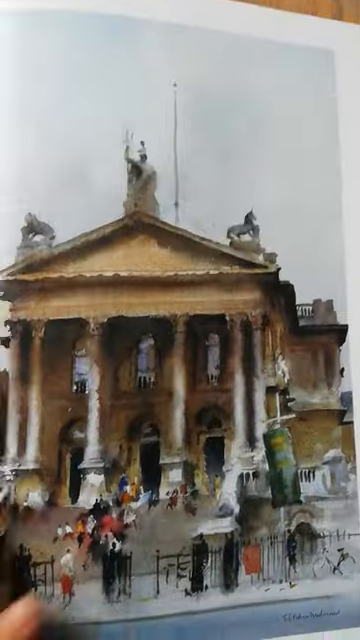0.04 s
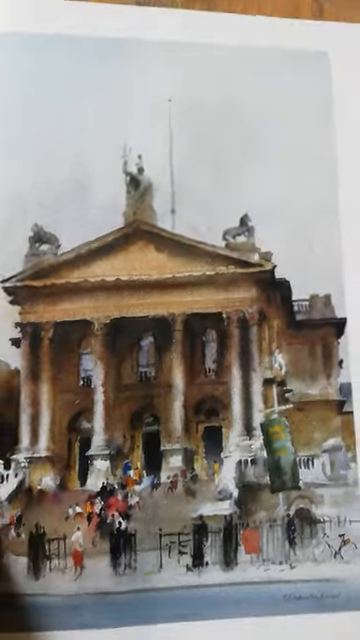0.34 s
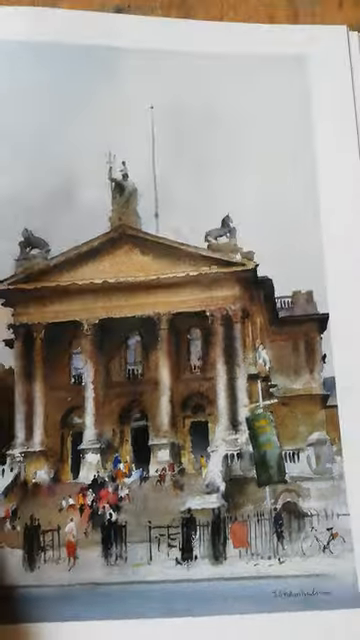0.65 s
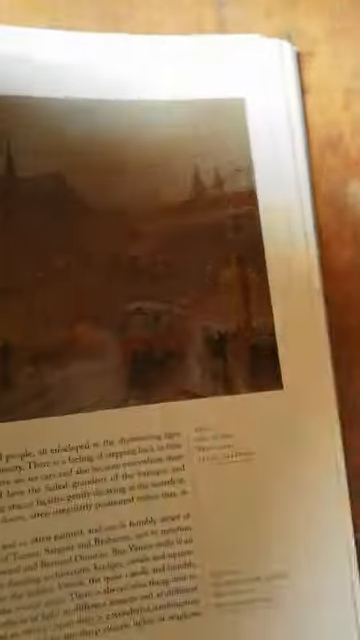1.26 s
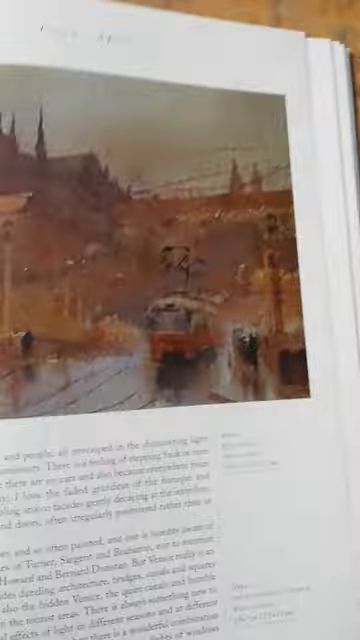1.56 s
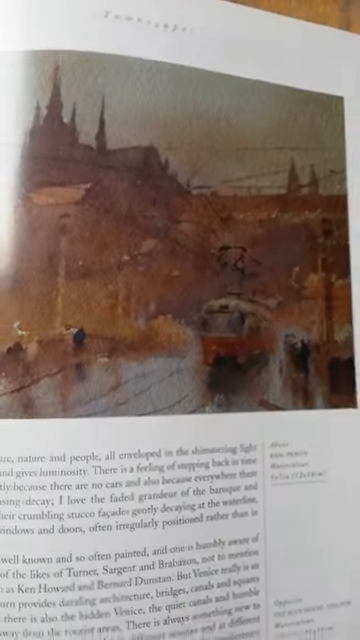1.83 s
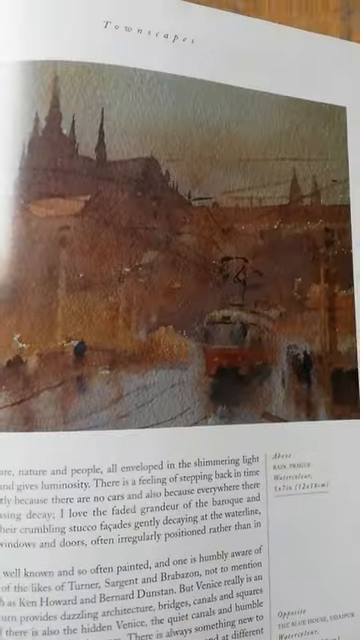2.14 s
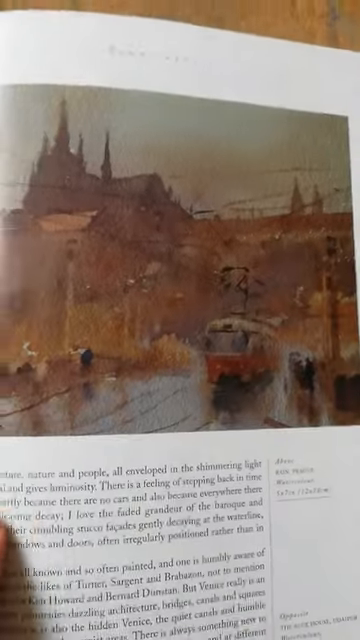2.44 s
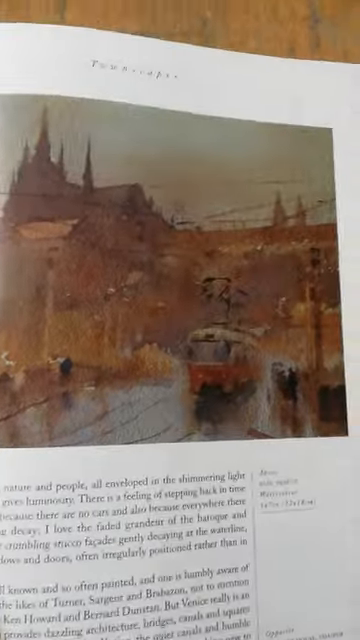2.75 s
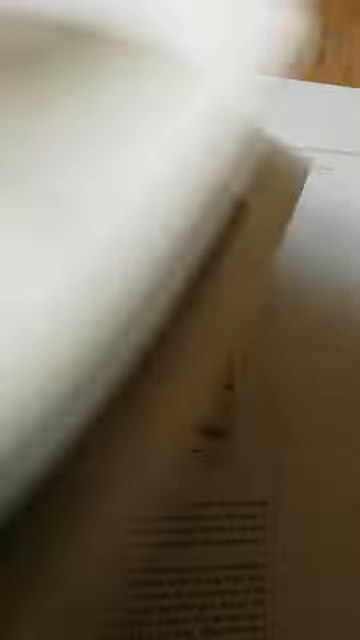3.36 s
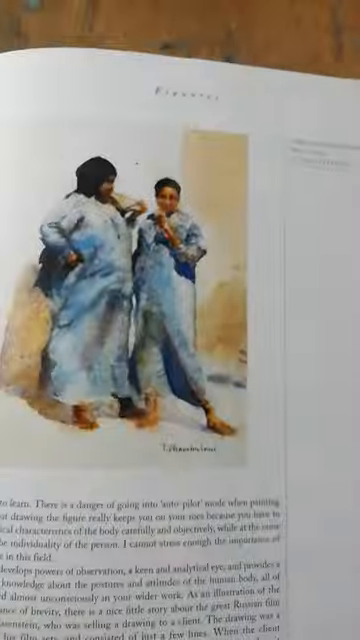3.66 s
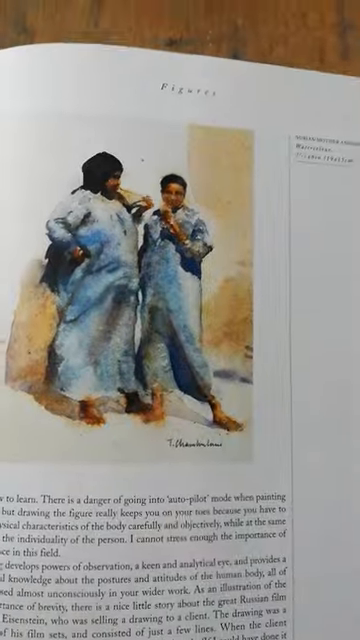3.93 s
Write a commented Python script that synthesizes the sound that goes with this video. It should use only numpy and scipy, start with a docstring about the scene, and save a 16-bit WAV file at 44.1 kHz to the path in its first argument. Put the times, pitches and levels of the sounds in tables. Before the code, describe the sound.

Two glossy book pages rustle and turn close by in a quiet room.

```python
"""A fine, gritty hiss of sliding paper comes first, over a faint hum, microphone hiss and low rumble.
Two pages of a large glossy book are turned on a table in a quiet room, close to the microphone.
Fingers and sheets rub in thousands of tiny slips, fingertips tap, and the paper snaps as it buckles.
The second page whips tight with a slap, then flops down on a cushion of air."""
import sys
import numpy as np
from scipy import signal
from scipy.fft import rfft, irfft, next_fast_len
from scipy.io import wavfile
from scipy.ndimage import uniform_filter1d

SR = 44100
rng = np.random.default_rng(int(sys.argv[2]) if len(sys.argv) > 2 else 0)


def materialize(psi):
    """Save the field psi as 16-bit PCM at rate SR to the path in sys.argv[1].

    A 1-D psi becomes a single channel; in a 2-D psi each row is a channel.
    """
    bounded = np.clip(np.atleast_2d(psi).T, -1, 1)
    quanta = np.round(bounded * 32767).astype(np.int16)
    wavfile.write(sys.argv[1], SR, quanta)


N = 176400
TIME = np.arange(N) / SR
SLIDE_PAN_DB, SNAP_LEAD_MS = 3.5, 0.2934
# tone colour of cracking paper: pitch_hz, level_db
CRACK_COLOUR = [(700, -9), (1800, 5.5), (2450, -6.5), (3900, 3), (5300, -14), (7000, -3), (9900, 3),
                (12200, -13)]


def from_db(db):
    """Turn decibels into a number to multiply by."""
    return 10 ** (np.asarray(db) / 20)


def rms_one(x):
    """Scale a signal so its average strength (rms) is 1."""
    return x / np.sqrt(np.mean(x ** 2) + 1e-20)


def coloured(x, colour):
    """Give a sound a tone colour: a curve through (pitch_hz, level_db) points."""
    size = next_fast_len(N + SR // 2, real=True)
    hz, db = np.transpose(colour)
    octave = np.log2(np.maximum(np.arange(size // 2 + 1) * SR / size, 1))
    octaves_below = np.maximum(np.log2(hz[0]) - octave, 0)
    gain = from_db(np.interp(octave, np.log2(hz), db) - 10 * octaves_below)
    # make the filter ring after a hit, never before it
    cepstrum = irfft(np.log(rms_one(gain)), size)
    cepstrum[1:size // 2] *= 2
    cepstrum[size // 2 + 1:] = 0
    return irfft(rfft(x, size) * np.exp(rfft(cepstrum)), size)[..., :N]


def drift(hz):
    """A smooth random wobble, quicker for higher hz."""
    pole = np.exp(-2 * np.pi * hz / SR)
    return rms_one(signal.lfilter([1], [1, -2 * pole, pole * pole], rng.standard_normal(N + SR))[SR:])


def swell(peak_s, rise_s, fall_s):
    """A bell-shaped rise and fall in loudness."""
    distance = (TIME - peak_s) / np.where(TIME < peak_s, rise_s, fall_s)
    return np.exp(-.5 * np.minimum(distance ** 2, 60))


def burst(start_s, hold_s, rise_s=0.00068, decay_s=0.00074):
    """The loudness of a crack: jump up, hold, die away fast."""
    attack = np.clip((TIME - start_s) / rise_s + 1, 0, 1)
    return attack * np.exp(-np.clip((TIME - start_s - hold_s) / decay_s, 0, 20))


def click(start_s):
    """A push one sample long."""
    return 1. * (np.arange(N) == int(start_s * SR))


def panned(db):
    """Left and right gains; positive db leans left."""
    return rms_one(from_db([[db / 2], [-db / 2]]))


def two_ears(x, lead_ms):
    """The sound reaches the left ear a little earlier."""
    half_s = lead_ms / 2000
    return np.array([np.interp(TIME + half_s, TIME, x), np.interp(TIME - half_s, TIME, x)])


def background(rumble_db=-56, hum_db=-61, hiss_db=-59):
    """Handling rumble and room hum sit in the middle, with microphone hiss around them."""
    # the rumble swells as the hands move: peak_s, half_width_s, level_db
    hand_moves = [(0.369, 0.075, -52), (1.26, 0.05, -51), (2.052, 0.21, -54), (3.66, 0.16, -52)]
    # tone colours of the three layers: pitch_hz, level_db
    rumble_colour = [(22, -4), (28, 10.5), (36, -7), (47, -4), (65, -13.5), (120, -51.5)]
    hum_colour = [(40, 0.5), (70, -6), (130, -1.5), (185, -5), (232, 2), (300, -6), (430, -21.5),
                  (900, -51)]
    hiss_colour = [(450, -2), (1800, 4), (2450, -3), (3800, 2.5), (6300, -10), (8000, -3), (10500, -4),
                   (12500, -13.5), (15500, -19.5)]
    rumble = coloured(rng.standard_normal(N), rumble_colour)
    rumble /= np.sqrt(uniform_filter1d(rumble ** 2, size=6000))  # even out its loudness
    rumble *= from_db(rumble_db) + sum(from_db(db) * swell(s, width, width) for s, width, db in hand_moves)
    hum = from_db(hum_db) * coloured(rng.standard_normal(N), hum_colour)
    hiss = from_db(hiss_db) * panned(-3.5) * coloured(rng.standard_normal((2, N)), hiss_colour)
    return rumble + hum + hiss


def friction(slips_per_s=9000, judder_db=2.5, judder_hz=41.7):
    """Rubbing paper makes tiny, uneven slips in shaky clumps; each ear gets its own."""
    sizes = from_db(-np.minimum(rng.exponential(1, (2, N)), 5))
    slips = (rng.random((2, N)) < slips_per_s / SR) * sizes * rng.choice([-1, 1], (2, N))
    return rms_one(slips * from_db(judder_db * drift(judder_hz)))


def slides(crinkles_per_s=38, crinkle_db=13, sheet_q=2.2):
    """Rubbing and stray crinkles make the bent sheet ring, with a rough rasp and a fine sizzle."""
    # sliding strokes: peak_s, rise_s, fall_s, pitch_hz, ring_db, rasp_db, sizzle_db
    strokes = [(0.346, 0.068, 0.022, 820, -58.5, -59, -54.5), (.474, .0011, 0.011, 970, -56.5, -56.5, -50),
               (0.999, 0.11, 0.052, 1130, -58.5, -57.5, -55.5),
               (1.03, 0.027, 0.056, 3000, -60, -64.5, -53.5), (1.27, 0.15, 0.27, 1320, -73.5, -62.5, -61.5),
               (1.87, 0.077, .075, 850, -58, -62.5, -56), (1.99, 0.025, 0.015, 1000, -58, -55.5, -49.5),
               (2.251, .0023, 0.05, 910, -61, -55, -45.5), (2.47, 0.1, .14, 1210, -59.5, -57, -59),
               (3.02, 0.083, .15, 950, -51.5, -54, -62), (3.024, .022, 0.015, 2980, -44, -44.5, -47.5),
               (3.076, 0.023, 0.048, 700, -50.5, -43.5, -44), (3.182, 0.02, .033, 590, -53.5, -42, -34.5),
               (3.252, 0.0097, 0.014, 700, -59.5, -39.5, -36), (3.311, 0.012, .06, 820, -46, -47.5, -50),
               (3.469, 0.093, .042, 1210, -62, -51, -49.5), (3.92, .045, 0.17, 1200, -78, -71, -62.5)]
    # tone colours of the sliding: pitch_hz, level_db
    rasp_colour = [(400, -9.5), (1600, -1), (2000, 4), (2400, 1), (3200, 1.5), (4100, 2.5), (5300, -2.5),
                   (7000, -2.5), (12000, -16.5)]
    sizzle_colour = [(2000, -44), (4500, -6), (7500, -3), (9600, 6.5), (10700, 3.5), (12500, -12),
                     (15500, -18)]
    crinkles = from_db(crinkle_db) * (rng.random(N) < crinkles_per_s / SR) * rng.standard_normal(N)
    slips = two_ears(friction()[0] + crinkles, lead_ms=0.15) + .5 * friction()
    rasp = panned(-4.5) * coloured(friction() + crinkles, rasp_colour)
    sizzle = coloured(friction() + crinkles, sizzle_colour)
    width = 1 + 1 / (2 * sheet_q)  # a higher q rings in a narrower band
    out = np.zeros((2, N))
    for peak_s, rise_s, fall_s, hz, ring_db, rasp_db, sizzle_db in strokes:
        narrow = signal.butter(1, [hz / width, hz * width], "band", fs=SR, output="sos")
        wide = signal.butter(2, [hz / 2, hz * 2], "band", fs=SR, output="sos")
        ring = rms_one(signal.sosfilt(wide, signal.sosfilt(narrow, slips)))
        mix = from_db(ring_db) * ring + from_db(rasp_db) * rasp + from_db(sizzle_db) * sizzle
        out += panned(SLIDE_PAN_DB) * swell(peak_s, rise_s, fall_s) * mix
    return out


def snaps():
    """Each time the sheet buckles it gives one hollow knock and a very short burst of cracks."""
    # the sheet buckles: start_s, crack_db, knock_db, pan_db
    buckles = [(.6899, -22, -20.5, -3), (.8145, -42.5, -30, 12), (1.3565, -42, -30.5, 7),
               (1.369, -41.5, -32, 6), (1.4712, -55, -31, 7), (2.249, -37.5, -20.5, 6),
               (2.623, -43.5, -37, -5), (2.8415, -43, -26, 18), (2.9079, -38, -26, 0),
               (3.099, -40, -25, -1)]
    # tone colour of the knock: pitch_hz, level_db
    knock_colour = [(120, 0.5), (640, -2), (900, -7), (2000, 0), (2900, -16)]
    cracks, knocks = np.zeros((2, N)), np.zeros((2, N))
    grains = rng.choice([-1., 1.], N)
    for start_s, crack_db, knock_db, pan_db in buckles:
        cracks += from_db(crack_db) * panned(pan_db) * two_ears(grains * burst(start_s, 0), SNAP_LEAD_MS)
        knocks += from_db(knock_db) * panned(pan_db) * two_ears(click(start_s), SNAP_LEAD_MS)
    return coloured(cracks, CRACK_COLOUR) + coloured(knocks, knock_colour)


def taps(ring_s=0.019, pan_db=6.5):
    """A fingertip sets the sheet ringing for a moment."""
    # fingertip taps: start_s, level_db, pitch_hz
    touches = [(0.83, -42, 940), (1.869, -42.5, 870), (2.408, -45.5, 775), (2.892, -36.5, 1020),
               (2.907, -34.5, 1060), (3.097, -31, 1230)]
    out = np.zeros((2, N))
    for start_s, db, hz in touches:
        age = np.clip(TIME - start_s, 0, 2 * ring_s)
        out += panned(pan_db) * from_db(db - 60 * age / ring_s) * np.sin(2 * np.pi * hz * age)
    return out


def rubs(ring_q=6.8):
    """Rubbing keeps the sheet ringing on one rough note while its pitch glides."""
    # ringing rubs: peak_s, rise_s, fall_s, pitch_at_peak_hz, glide_octaves_per_s, level_db
    notes = [(.92, 0.0098, 0.027, 1333, -2, -51), (2.996, .022, 0.062, 2045, -1, -46.5),
             (3.091, 0.028, 0.039, 3740, 2.5, -46)]
    out = 0
    for peak_s, rise_s, fall_s, hz, glide, db in notes:
        pitch_hz = hz * 2 ** (glide * np.clip(TIME - peak_s, -2 * rise_s, 2 * fall_s))
        phase = 2 * np.pi * np.cumsum(pitch_hz) / SR
        waver = signal.sosfilt(signal.butter(2, hz / (2 * ring_q), fs=SR, output="sos"), friction())
        out += from_db(db) * swell(peak_s, rise_s, fall_s) * rms_one(waver * np.cos(phase))
    return panned(SLIDE_PAN_DB) * out


def slap(start_s=3.2916, crackle_db=-18.5, thwack_db=3, echo_s=.0105, echo_db=-15):
    """The second page whips tight with a crackle and a thwack, followed by one quick, quieter echo."""
    # tone colour of the hollow thwack: pitch_hz, level_db
    thwack_colour = [(150, -26.5), (610, 2), (780, -7), (1040, 6), (1550, -6), (2000, 4), (2900, -25.5)]
    crackle = coloured(friction() * burst(start_s, hold_s=0.0022), CRACK_COLOUR)
    thwack = two_ears(coloured(click(start_s), thwack_colour), SNAP_LEAD_MS)
    hit = from_db(crackle_db) * crackle + from_db(thwack_db) * panned(SLIDE_PAN_DB) * thwack
    return hit + from_db(echo_db) * np.roll(hit, int(echo_s * SR), axis=1)


def flops(puff_stretch=2.45, pan_db=1.5):
    """The landing sheet gives a hollow flap and pushes out a longer, low puff of air."""
    # the page settles: peak_s, rise_s, fall_s, flap_db, puff_db
    landings = [(3.305, 0.0045, 0.019, -45.5, -49), (3.389, 0.0092, 0.0094, -38.5, -46),
                (3.652, 0.0059, 0.0036, -37, -47.5), (3.66, 0.025, 0.026, -57, -57.5)]
    # tone colours of the flap and the puff: pitch_hz, level_db
    flap_colour = [(250, -10.5), (560, 8), (700, 8.5), (900, -2.5), (1120, 9), (1300, 12), (1600, -33),
                   (4000, -44)]
    puff_colour = [(25, -7), (50, 6), (250, 1.5), (800, -25)]
    flap_noise = coloured(rng.standard_normal(N), flap_colour)
    puff_noise = coloured(rng.standard_normal(N), puff_colour)
    out = 0
    for peak_s, rise_s, fall_s, flap_db, puff_db in landings:
        flap = from_db(flap_db) * flap_noise * swell(peak_s, rise_s, fall_s)
        puff = from_db(puff_db) * puff_noise * swell(peak_s, puff_stretch * rise_s, puff_stretch * fall_s)
        out += two_ears(flap + puff, lead_ms=0.33)
    return panned(pan_db) * out


def room(x, level_db=-10.5, fade_s=0.13, delay_s=0.0029):
    """The table and walls send back a short blur of echoes."""
    age = TIME[:SR // 2]
    tail = rng.standard_normal((2, len(age))) * from_db(-60 * age / fade_s) * (age > delay_s)
    tail /= np.sqrt(np.sum(tail ** 2, axis=1, keepdims=True))
    return from_db(level_db) * signal.fftconvolve(x, tail, axes=1)[:, :N]


def scene():
    """The paper and its echoes over the quiet background."""
    paper = slides() + rubs() + snaps() + slap() + taps() + flops()
    return paper + room(paper) + background()


def record(dry, cutoff_hz=15750):
    """Cut away the very highest treble."""
    return signal.sosfilt(signal.ellip(10, .1, 70, cutoff_hz, fs=SR, output="sos"), dry)


dry = scene()
out = record(dry)
materialize(out)
```